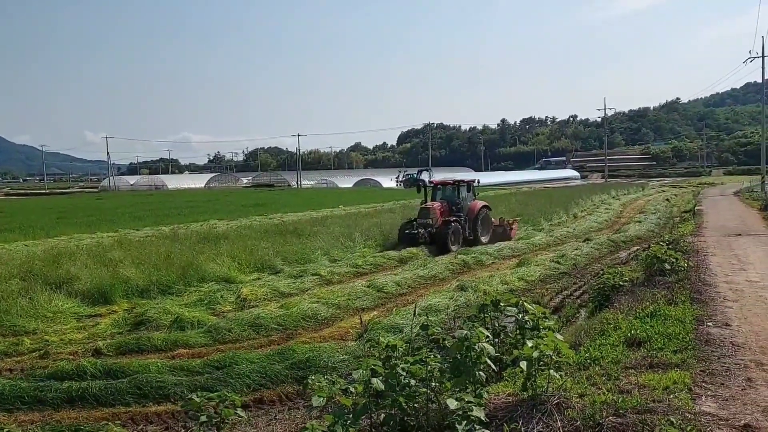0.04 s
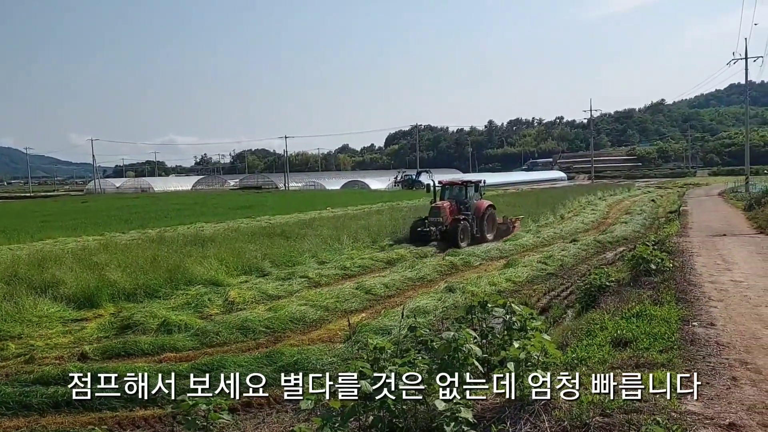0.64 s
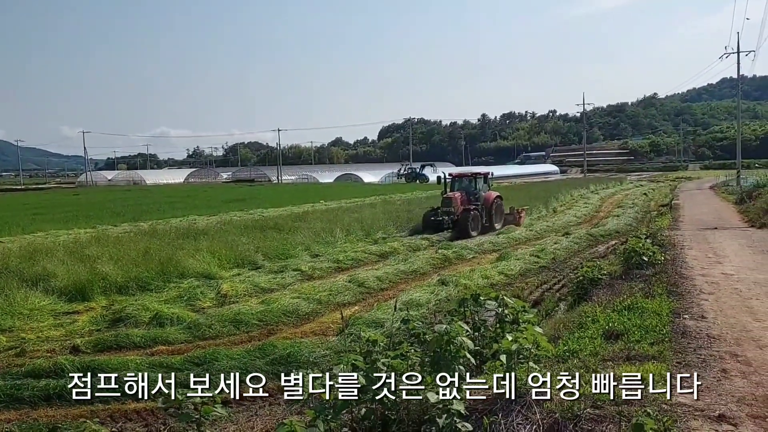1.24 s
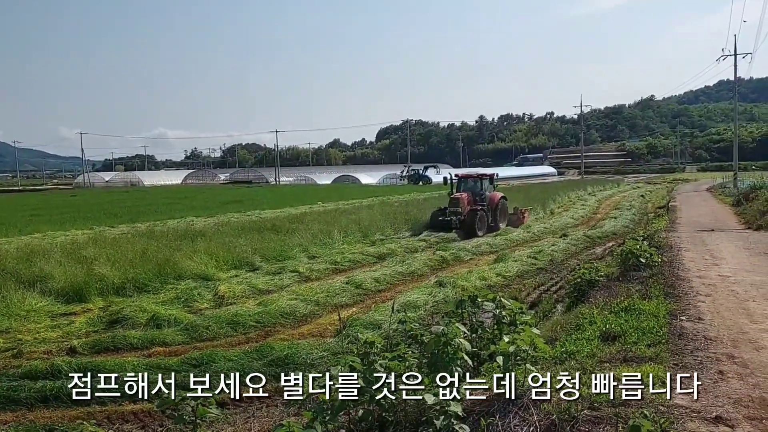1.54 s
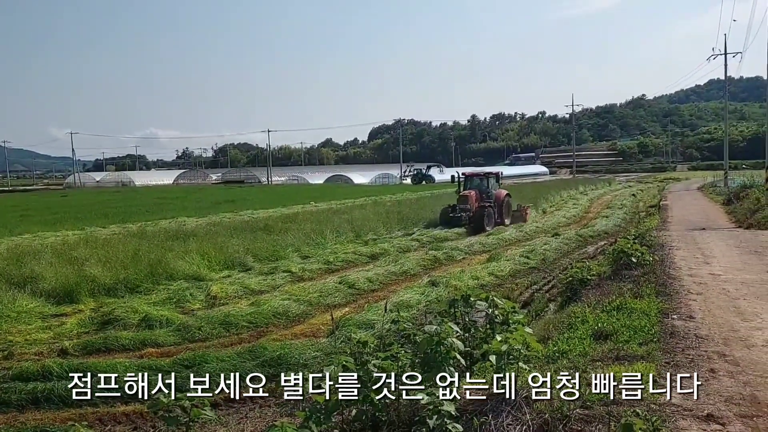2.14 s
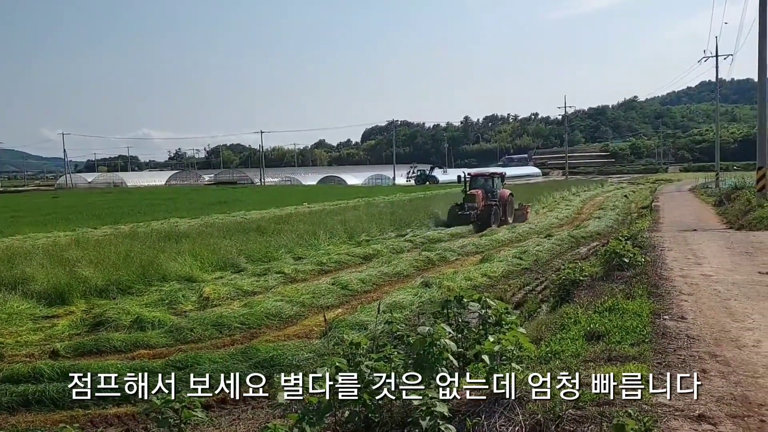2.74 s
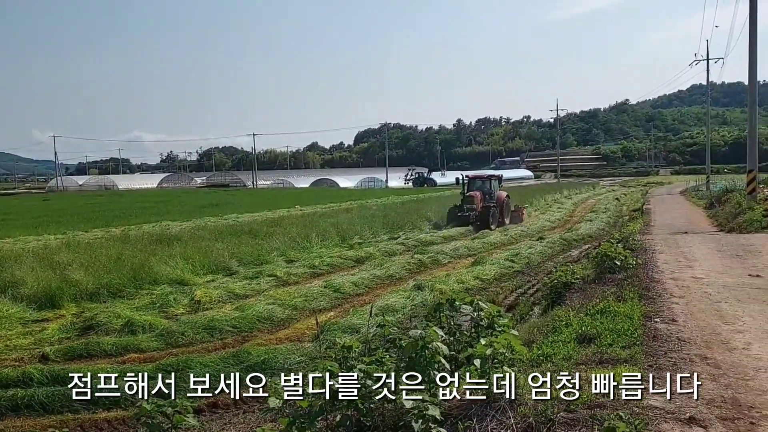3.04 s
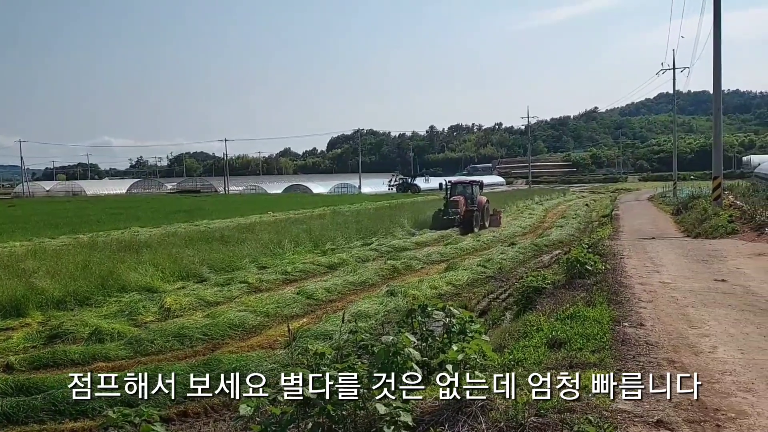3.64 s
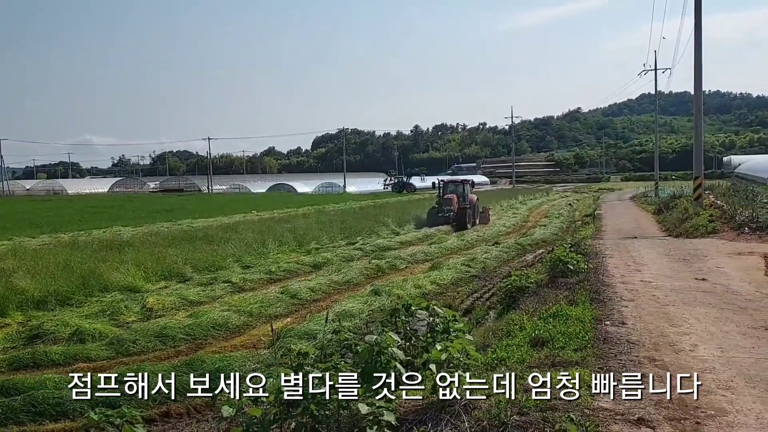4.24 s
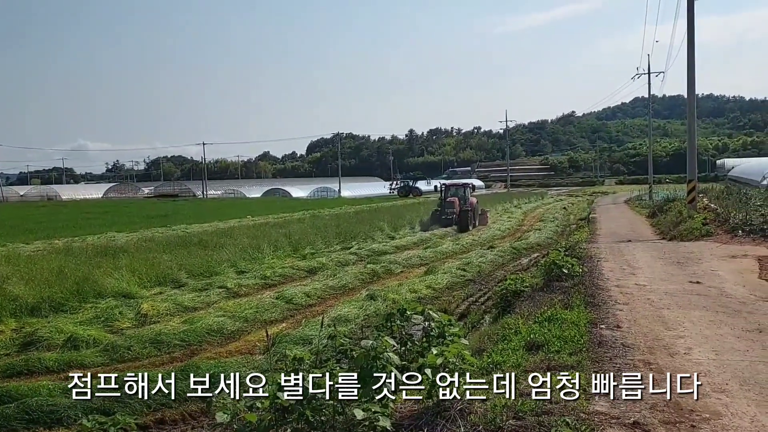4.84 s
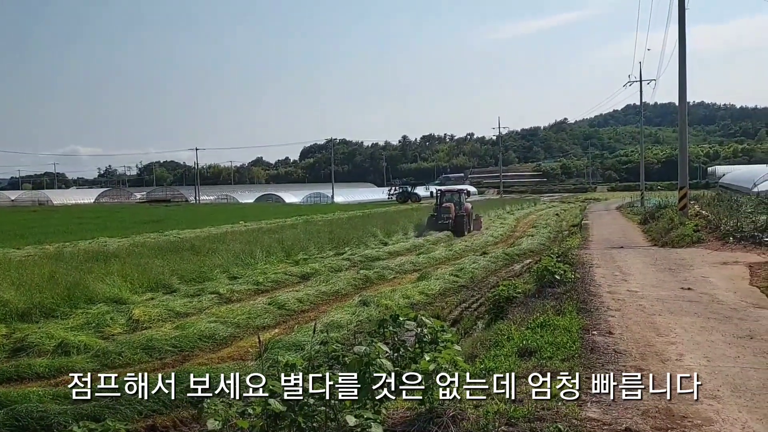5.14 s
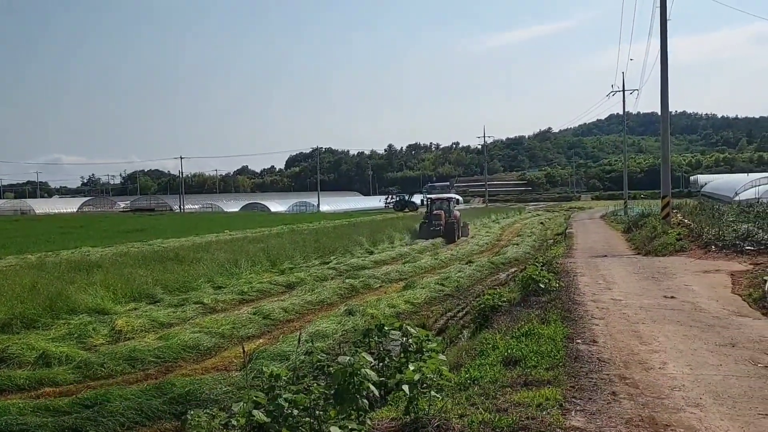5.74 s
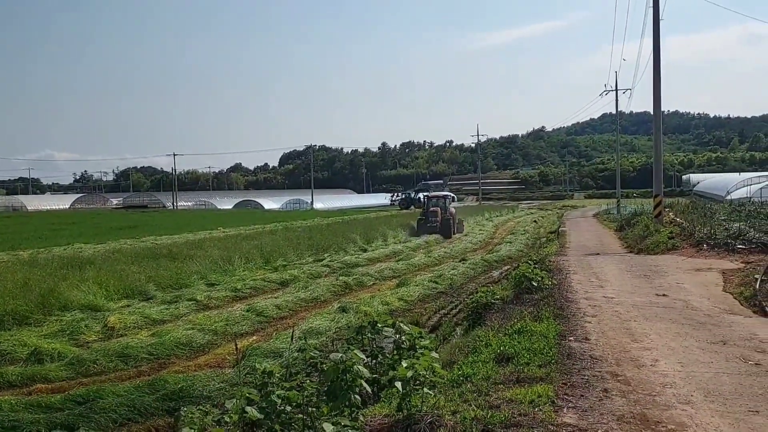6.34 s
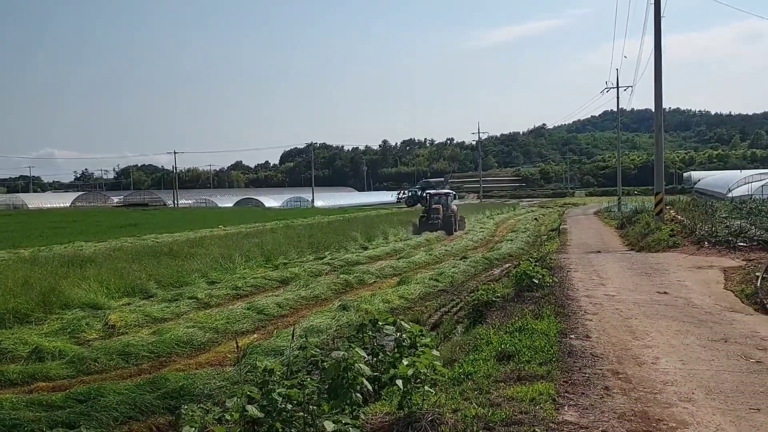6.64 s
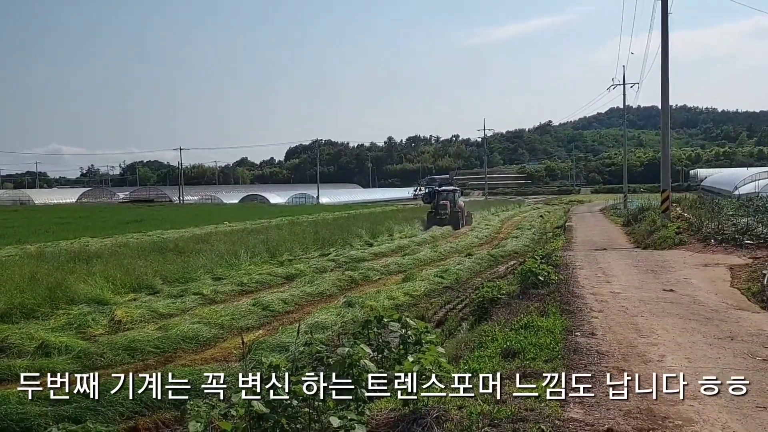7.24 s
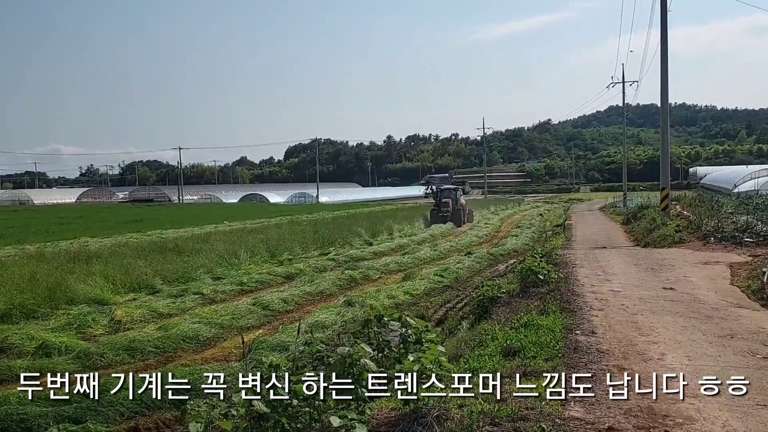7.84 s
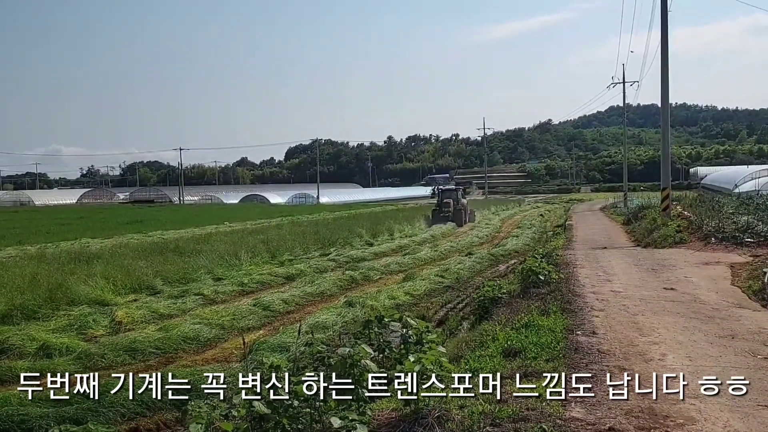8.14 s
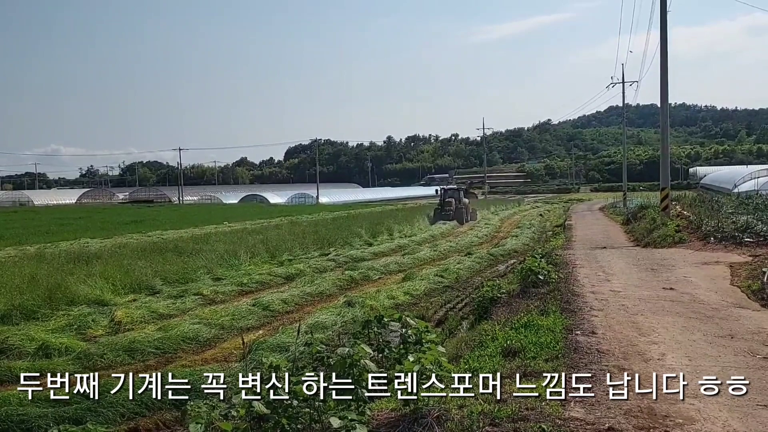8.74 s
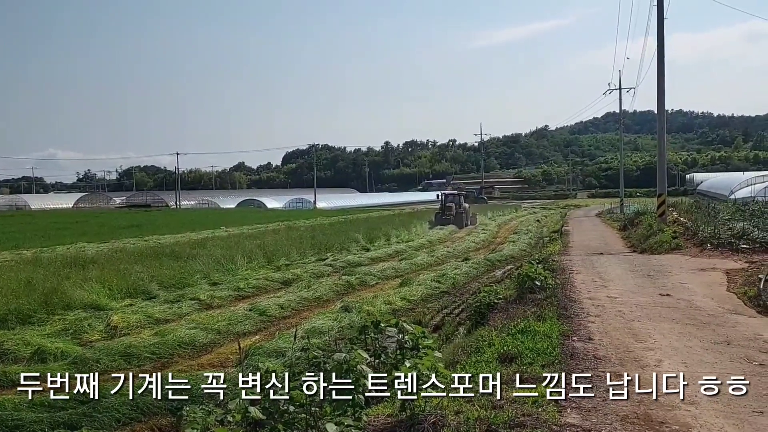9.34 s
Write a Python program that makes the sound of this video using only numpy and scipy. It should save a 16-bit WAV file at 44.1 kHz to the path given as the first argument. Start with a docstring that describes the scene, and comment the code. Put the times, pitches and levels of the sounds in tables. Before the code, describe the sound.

A diesel tractor hums and clatters away while mowing tall grass, with faint bird chirps and a breeze buffeting the microphone late on.

```python
"""A diesel tractor drives away across a field, pulling a mower through tall grass.
Its firing hum sags in pitch where the grass thickens. The blades, geared to the crank, whine over
the hollow roar of the deck; the engine casing clatters, gears sing and cut stalks hiss.
A small far bird chirps faintly. Late on, a breeze buffets the microphone, mostly on the right."""
import sys
import numpy as np
from scipy import signal
from scipy.fft import rfft, irfft
from scipy.io import wavfile
from scipy.ndimage import map_coordinates

SR = 44100
rng = np.random.default_rng(int(sys.argv[2]) if len(sys.argv) > 2 else 0)


def master_out(mix):
    """Clip the mix to full scale and print it as 16-bit PCM to the path in sys.argv[1]."""
    frames = np.transpose(np.atleast_2d(mix))
    ceiling = np.clip(frames, -1, 1)
    pcm = np.round(ceiling * 32767).astype(np.int16)
    wavfile.write(sys.argv[1], SR, pcm)


N = 423360
FIRINGS_PER_TURN, BLADES_PER_TURN = 4, 14.69


def engine(crank_turns, doublings):
    """Exhaust: firing hum, weaker crank orders and pulsing gas rumble."""
    # firing hum: t/s, level/dB
    hum_curve = [(0.05, -17.5), (1.36, -18.5), (3.35, -21), (3.5, -24), (3.78, -20.5), (4.79, -23),
                 (4.95, -21.5), (6.1, -27.5), (6.21, -32), (6.62, -26.5), (7.11, -30), (7.18, -26),
                 (7.68, -27), (8.03, -34), (8.16, -26), (8.6, -24.5), (8.7, -27.5), (9.3, -27.5)]
    # weaker tones: crank order, start level/dB
    crank_orders = [(2, -65), (3.5, -44), (6, -44.5), (7, -52), (8, -42), (10, -51), (12, -52.5),
                    (22, -44.5), (24, -45)]
    # exhaust resonances: f/Hz, width/Hz, gain/dB
    exhaust_modes = [(89.5, 115, -5.5), (129, 70, 2.5), (227.6, 26, -4), (270.6, 46, -6), (382, 115, -9.5)]
    hum = from_db(in_time(hum_curve)) * tone(FIRINGS_PER_TURN * crank_turns, flutter=0.03)
    tones = 0
    for order, db in crank_orders:
        gain = receding(doublings, start_db=db + 1.4 * drift(1.2), loss_db=5) + order_swells(order)
        tones += gain * tone(order * crank_turns, flutter=0.42)
    gas = field_noise(resonant(exhaust_modes), firing_pulses(crank_turns, depth_db=2, uneven_db=1.2))
    return hum + tones + receding(doublings, start_db=-32.5, loss_db=4.5) * gas


def mower(crank_turns, doublings):
    """Blades whine at their passing rate and its octave, and stir the air under the deck."""
    # octave of the blade rate: t/s, level/dB
    octave_curve = [(0, -36), (1.6, -34.5), (2.8, -33.5), (3.6, -39.5), (4.4, -39.5), (5.6, -46.5),
                    (7.6, -60), (8.5, -43), (9.6, -40)]
    # deck resonances: f/Hz, width/Hz, gain/dB
    deck_modes = [(536, 113, -4.5), (637.6, 72, 0.5), (729, 79, -0.5), (764, 125, -8)]
    passes = BLADES_PER_TURN * crank_turns
    passing_gain = receding(doublings, start_db=-47, loss_db=7.5) + order_swells(BLADES_PER_TURN)
    whine = passing_gain * tone(passes, flutter=0.26)
    whine += from_db(in_time(octave_curve)) * tone(2 * passes, flutter=0.15)
    air = field_noise(resonant(deck_modes), firing_pulses(crank_turns, depth_db=0.9, uneven_db=0))
    roar = receding(doublings, start_db=-31.5, loss_db=2.5) * air
    return roar + whine * from_db([[0.8], [-0.8]])  # whine slightly left


def clatter(crank_turns, doublings):
    """Combustion knock rings the casing; gear tones are blurred by tooth play."""
    # casing resonances: f/Hz, width/Hz, gain/dB
    casing_modes = [(1013, 250, -4), (1168, 70, 3), (1274, 120, 0), (1667, 307, -5.5), (1957, 264, -7),
                    (2377, 345, -10.5), (3000, 610, -12.5)]
    # gear mesh tones: crank order, start level/dB
    mesh_orders = [(44.1, -47.5), (46.8, -51), (70.5, -52), (156.6, -55), (174.6, -56)]
    play_turns = 0.0013
    knock = field_noise(resonant(casing_modes), firing_pulses(crank_turns, depth_db=1, uneven_db=0.36))
    gears = 0
    for order, db in mesh_orders:
        gain = receding(doublings, start_db=db + drift(1.6), loss_db=0.7) + order_swells(order)
        gears += gain * tone(order * (crank_turns + play_turns * drift(25)), flutter=0.94)
    return receding(doublings, start_db=-35, loss_db=1.84) * knock + gears


def cutting(crank_turns):
    """Stalks scrape as they are cut, swish as they fall and shred with a grainy, shifting hiss."""
    # grass feed: t/s, relative level/dB
    feed_curve = [(0.05, -42), (1.53, -43.5), (2.19, -47), (4.76, -43.5), (5.37, -46), (5.87, -41.5),
                  (7.46, -47.5), (7.91, -44), (8.57, -49.5), (9.36, -50), (9.55, -47.5)]
    # shredding hiss: t/s, relative level/dB
    hiss_curve = [(0.05, -45.5), (0.74, -44), (0.89, -50.5), (1.93, -45.5), (1.98, -50.5), (3.38, -45.5),
                  (3.88, -51.5), (6.13, -50), (6.37, -55), (8.33, -49.5), (8.57, -55.5), (9.55, -57)]
    # peaks in the lower cutting hiss: f/Hz, width/Hz, gain/dB
    cutting_hiss_peaks = [(3640, 400, 3), (4144, 320, 4.5), (4630, 340, 4.5), (5050, 260, 1.5)]
    # falling stalks: f/Hz, width/Hz, gain/dB
    swish_bands = [(5460, 510, -1), (6060, 440, -1), (6600, 280, 2), (6960, 1340, -2), (14800, 1800, -12)]
    # shredding: f/Hz, width/Hz, relative level/dB
    hiss_bands = [(8430, 710, -8), (9300, 2000, 1.5), (10580, 990, 0.5), (11300, 390, -1.5),
                  (12000, 660, -2.5), (12700, 750, -6.5), (13200, 2100, -2), (15600, 1600, -8.5)]
    scrape_db, swish_db, hiss_db = -44.5, -46, -48.5  # at the curves' means
    feed_db, treble_db = in_time(feed_curve), in_time(hiss_curve)
    surge_db = feed_db - feed_db.mean()
    pulsing = firing_pulses(crank_turns, depth_db=0.25, uneven_db=-0.4)
    rough = pulsing * from_db(1.3 * drift(150))
    scrape = from_db(scrape_db + surge_db) * field_noise(resonant(cutting_hiss_peaks), rough)
    grainy = pulsing * from_db(1.5 * drift(400))
    swish = from_db(swish_db + 1.23 * surge_db) * field_noise(resonant(swish_bands), grainy)
    hiss = 0
    for hz, width_hz, db in hiss_bands:  # moving air shifts the colour
        hiss += from_db(db + drift(10)) * field_noise(resonant([(hz, width_hz, 0)]), grainy)
    return scrape + swish + from_db(hiss_db + treble_db - treble_db.mean()) * rms_one(hiss)


def breeze():
    """Lumpy low eddies, separate at each microphone port."""
    # buffeting spectrum: f/Hz, gain/dB
    spectrum = [(15, -23), (30, -10), (55, 2.5), (100, 6.5), (150, 2), (260, -7.5), (400, -19), (900, -26),
                (3000, -62)]
    eddies = [rng.standard_normal(N) * from_db(2.8 * drift(20)) for port in range(2)]
    buffets = rms_one(irfft(rfft(eddies) * from_db(over_hz(spectrum)), N))
    return wind_strength() * buffets


def wind_strength():
    """Gain per port: a breeze with random lulls, plus gusts that rise, hold and decay."""
    # gusts: start/s, hold/s, level/dB, left minus right/dB
    gusts = [(5.7, 0.62, -37, -6), (7.44, 0.099, -33.5, -4), (7.84, 0.14, -36.5, 3), (8.34, 0.11, -30, -2),
             (8.48, 0.21, -30, -11), (8.838, 0.08, -26.5, -1), (9.09, 0.089, -25.5, -15),
             (9.22, 0.28, -26.5, -9)]
    onset_s, rise_s = 5.22, 0.3
    breeze_db, breeze_pan_db, lulls_db = -41.5, -2.5, 5.5
    attack_s, release_s = 0.017, 0.078
    t, sides = seconds(), np.array([[0.5], [-0.5]])
    blowing = np.clip((t - onset_s) / rise_s, 0, 1)
    power = (blowing * from_db(breeze_db + breeze_pan_db * sides + lulls_db * drift(2.5))) ** 2
    for start_s, hold_s, db, pan_db in gusts:
        rise = np.clip((t - start_s) / attack_s, 0, 1)
        fall = np.exp(-np.maximum(t - start_s - attack_s - hold_s, 0) / release_s)
        power += (rise * fall * from_db(db + pan_db * sides)) ** 2
    return np.sqrt(power)


def bird():
    """Short thin chirps that rise and level off."""
    # chirps: t/s, peak level/dB
    chirps = [(4.085, -49), (5.275, -50), (8.963, -49), (9.374, -49)]
    length_s, start_hz, rise_hz = 0.035, 5600, 357
    along = np.linspace(0, 1, round(length_s * SR))
    hz = start_hz + rise_hz * np.sin(2 * along)
    chirp = np.sin(np.pi * along) * np.sin(2 * np.pi * np.cumsum(hz) / SR)
    out = np.zeros(N)
    for start_s, db in chirps:
        start = round(start_s * SR)
        out[start:start + len(chirp)] += from_db(db) * chirp
    return out


def firing_pulses(crank_turns, depth_db, uneven_db):
    """Gain surge at each firing, every second one stronger."""
    angle = 2 * np.pi * FIRINGS_PER_TURN * crank_turns
    return from_db(depth_db * np.cos(angle) + uneven_db * np.cos(angle / 2))


def tone(cycles, flutter):
    """Tone of a rotating part; moving air and uneven load shake its strength and phase."""
    angle = 2 * np.pi * (cycles + rng.random())
    return rms_one((1 + flutter * drift(5.8)) * np.sin(angle) + flutter * drift(2.8) * np.cos(angle))


def order_swells(order):
    """Added gain as the tone at this crank order swells and sinks."""
    # tone swells: crank order, middle/s, length/s, peak level/dB
    swells = [(14.69, 0.87, 1.9, -42.5), (70.5, 1.45, 2.5, -51), (24, 1.77, 0.79, -42),
              (6, 2.24, 0.75, -35), (156.6, 4.55, 1.4, -50), (24, 5.11, 1.3, -40), (24, 7, 1, -49),
              (24, 7.8, 0.9, -39.5)]
    return sum(from_db(db) * swell(middle_s, length_s)
               for which, middle_s, length_s, db in swells if which == order)


def field_noise(spectrum, pulsing):
    """Pulsed, filtered stereo noise; scattering off the field makes the sides differ in the treble."""
    # left-right likeness: f/Hz, correlation
    likeness = [(100, 1), (400, 0.97), (700, 0.99), (1300, 0.98), (2000, 1), (3000, 0.42), (5500, 0.37),
                (9500, 0.35), (16000, 0.41)]
    # balance: f/Hz, left minus right/dB
    balance = [(100, -1.5), (400, 0), (700, 2), (1290, -1), (2400, 0), (3600, -2), (4200, -7.5),
               (5500, -1.5), (6700, -6.5), (8200, -1), (15000, 0)]
    mid, side = rfft(rng.standard_normal((2, N)) * pulsing)
    alike, sides = over_hz(likeness), np.array([[1], [-1]])
    pair = np.sqrt(1 + alike) * mid + np.sqrt(1 - alike) * side * sides
    return rms_one(irfft(pair * spectrum * from_db(sides * over_hz(balance) / 2), N))


def resonant(peaks):
    """Gain per bin of a set of steep-sided peaks."""
    f, power = bins_hz(), 0
    for hz, width_hz, db in peaks:
        detuning = (f * f - hz * hz) / (2 * f * width_hz)
        power += from_db(db) ** 2 / (1 + 2 * detuning ** 2) ** 3
    return np.sqrt(power)


def receding(doublings, start_db, loss_db):
    """Gain that falls by loss_db per doubling of distance."""
    return from_db(start_db - loss_db * doublings)


def swell(middle_s, length_s):
    """Smooth bump from 0 to 1 and back."""
    return np.cos(np.pi * np.clip((seconds() - middle_s) / length_s, -0.5, 0.5)) ** 2


def drift(corner_hz):
    """Low-passed random wander, unit RMS."""
    return rms_one(irfft(rfft(rng.standard_normal(N)) / (1 + (bins_hz() / corner_hz) ** 2), N))


def in_time(curve):
    """Curve interpolated at every sample."""
    return np.interp(seconds(), *np.transpose(curve))


def over_hz(curve):
    """Curve interpolated at every bin, over log frequency."""
    hz, value = np.transpose(curve)
    return np.interp(np.log(bins_hz()), np.log(hz), value)


def seconds():
    """Sample times."""
    return np.arange(N) / SR


def bins_hz():
    """Bin frequencies, floored at 1 Hz."""
    return np.maximum(np.arange(N // 2 + 1) * SR / N, 1)


def from_db(db):
    """Decibels to gain."""
    return 10 ** (np.asarray(db) / 20)


def rms_one(x):
    """Scale to unit RMS."""
    return x / np.sqrt(np.mean(x ** 2) + 1e-20)


def scene():
    """One crank, slowed by thick grass, drives the receding machine; breeze and bird join it."""
    # thick grass: middle/s, length/s, firing rate sag/Hz
    thick_grass = [(0.52, 0.8, 0.9), (2.15, 1.3, 1.9), (2.75, 1.1, 2.9), (5.95, 1.7, 4.1), (6.7, 1.1, 2.1),
                   (8.7, 2.4, 1.9)]
    # tractor to the right: t/s, left lag/ms
    lag_curve = [(0, .088), (3, .088), (5.5, .055), (9.6, .058)]
    governed_hz, start_m, speed_m_per_s = 106.85, 24.5, 3.2
    sag_hz = sum(hz * swell(middle_s, length_s) for middle_s, length_s, hz in thick_grass)
    crank_turns = np.cumsum((governed_hz - sag_hz) / FIRINGS_PER_TURN) / SR
    doublings = np.log2(1 + speed_m_per_s * seconds() / start_m)  # of distance
    tractor = engine(crank_turns, doublings) + clatter(crank_turns, doublings)
    left, right = tractor + mower(crank_turns, doublings) + cutting(crank_turns)
    lag_samples = in_time(lag_curve) * SR / 1000
    left = map_coordinates(left, [np.arange(N) - lag_samples], order=5, mode="nearest")
    return np.array([left, right]) + breeze() + bird()


def record(dry):
    """Steep low-pass."""
    cutoff_hz = 15850
    return signal.sosfilt(signal.ellip(12, 0.1, 90, cutoff_hz, fs=SR, output="sos"), dry)


dry = scene()
out = record(dry)
master_out(out)
```